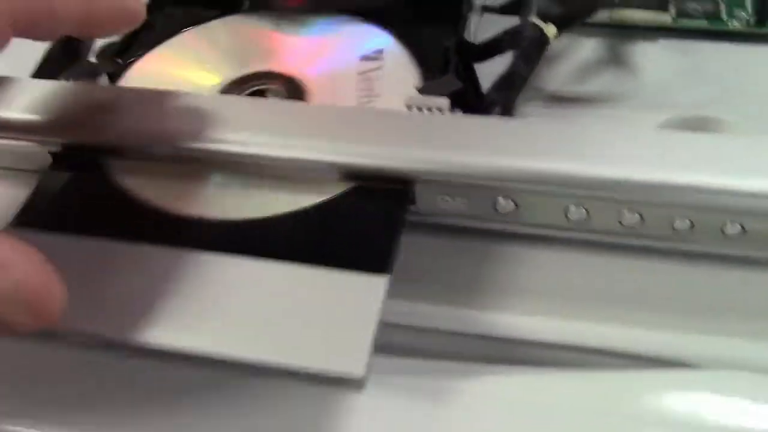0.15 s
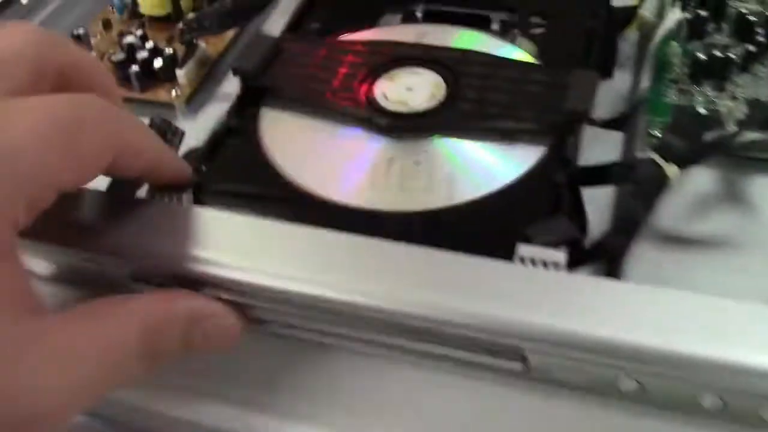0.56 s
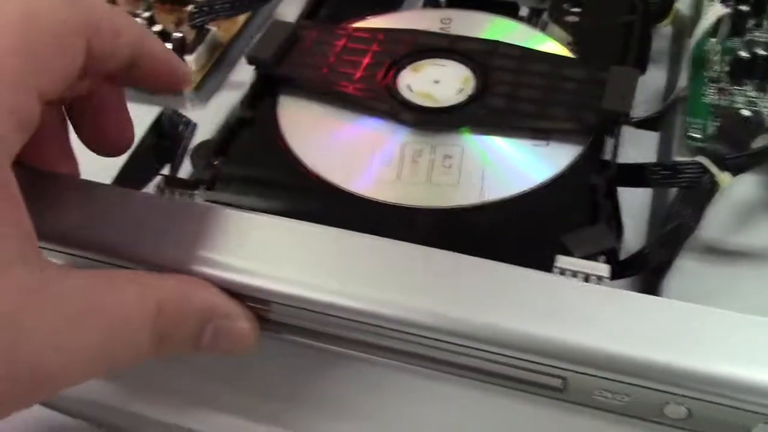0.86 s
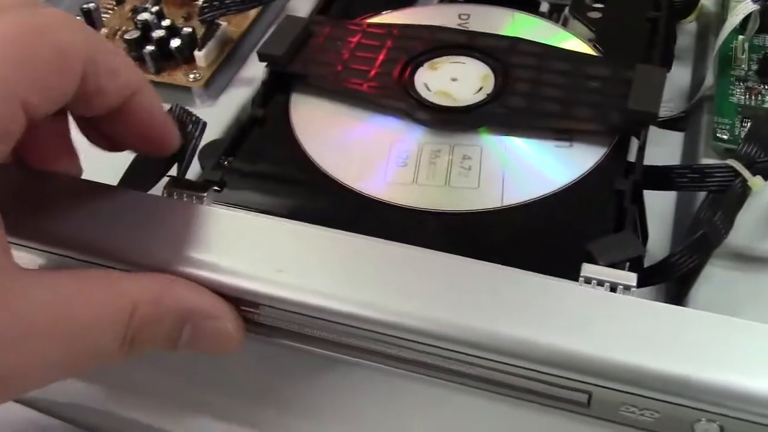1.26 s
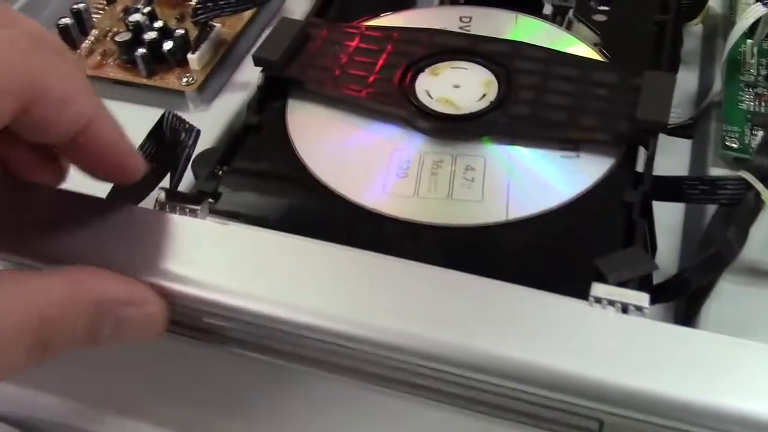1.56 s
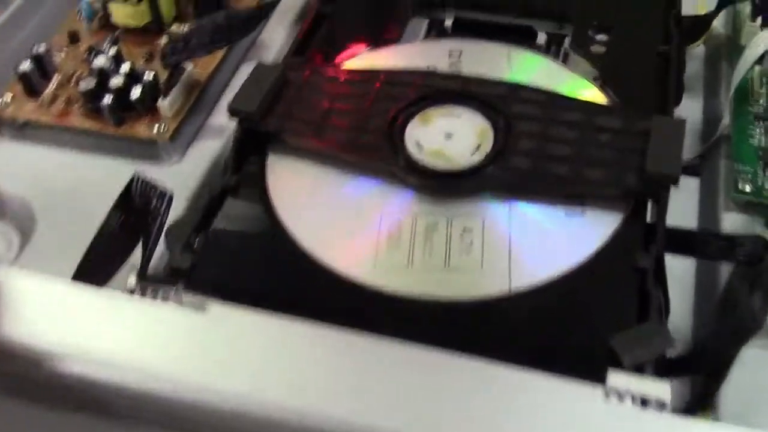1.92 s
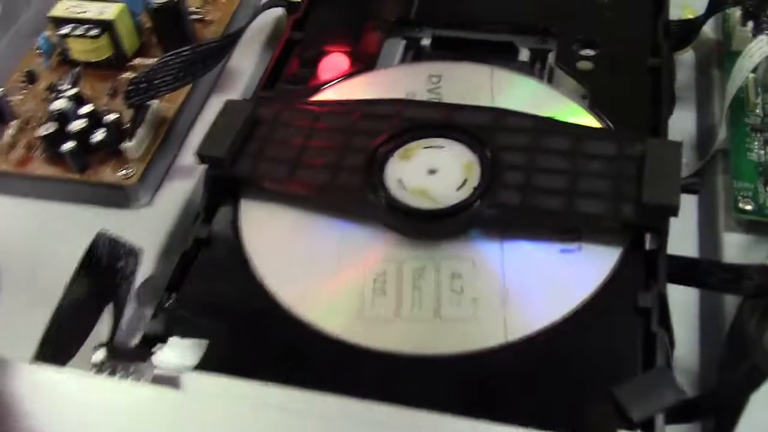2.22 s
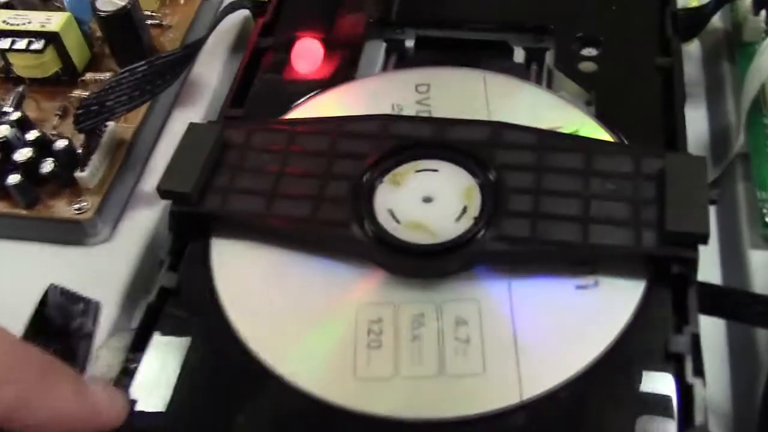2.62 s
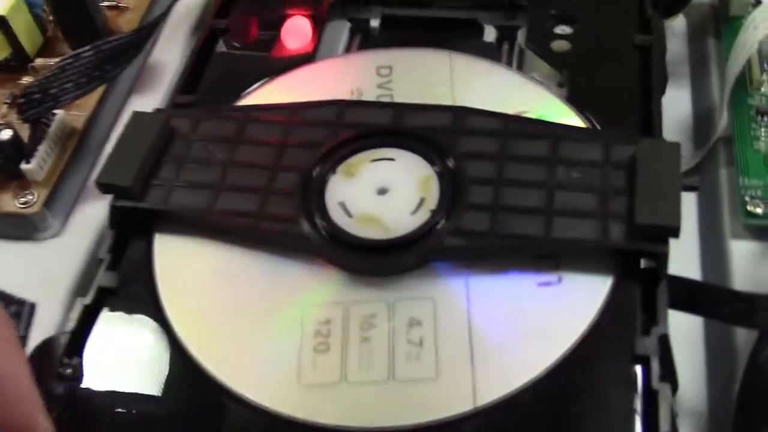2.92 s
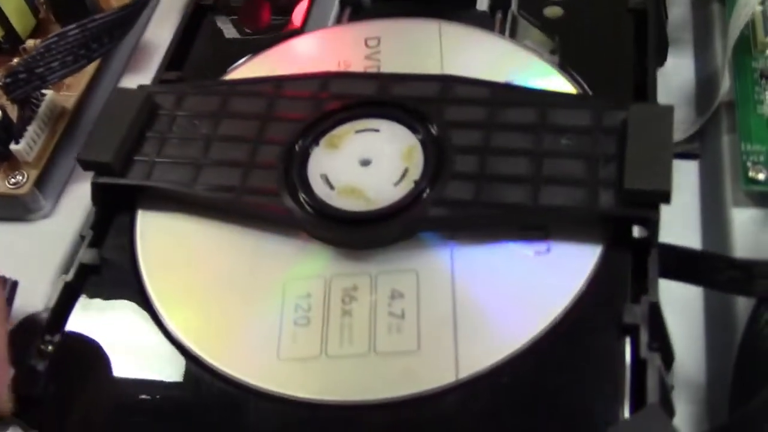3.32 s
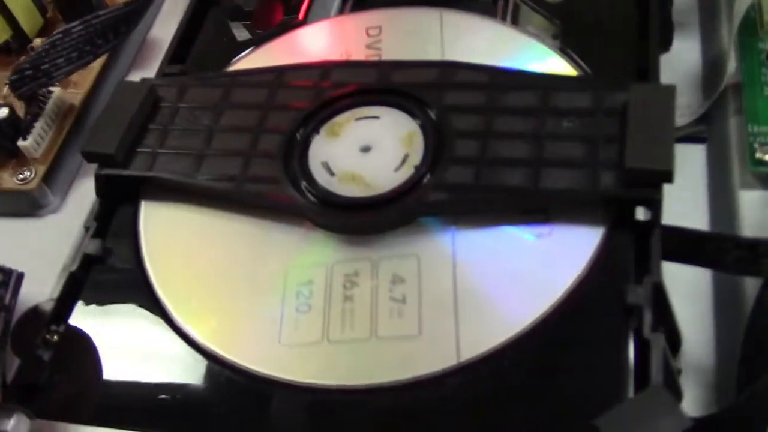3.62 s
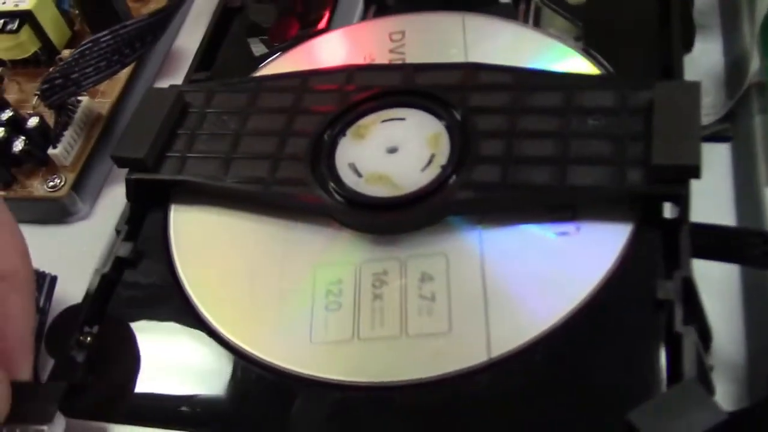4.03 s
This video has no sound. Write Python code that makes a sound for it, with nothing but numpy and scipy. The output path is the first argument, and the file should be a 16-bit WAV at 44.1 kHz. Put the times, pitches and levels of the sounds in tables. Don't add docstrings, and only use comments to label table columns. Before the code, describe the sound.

A plastic disc tray is pushed into an opened player on a workbench, rails scraping and a small gear whining for under half a second. Latch, clamp and end stop then clatter loudly in quick succession. Afterwards it is quiet: small regular lens buzzes, finger ticks, rubs and dull knocks over hiss and mains hum. Close stereo microphone, small room with a very short echo.

```python
import sys
import numpy as np
from scipy import signal
from scipy.fft import rfft, irfft
from scipy.io import wavfile
from scipy.ndimage import uniform_filter1d

SR = 44100
rng = np.random.default_rng(int(sys.argv[2]) if len(sys.argv) > 2 else 0)


def nominal_scale(level):
    x = np.asarray(level, float) / 20
    return 10 ** x


def master(y):
    cut = np.clip(np.atleast_2d(y).T, -1, 1)
    pcm = np.round(cut * 32767)
    wavfile.write(sys.argv[1], SR, pcm.astype(np.int16))


N = 184073

# frequency in Hz, likeness from 0 to 1.
NEAR_LIKENESS = [(60, 0.87), (180, 0.98), (550, 0.94), (1650, 0.94), (4970, 0.8), (15000, 0.56)]


def rms_one(x):
    return x / np.sqrt(np.mean(x ** 2) + 1e-20)


def in_time(rows):
    s, *columns = np.transpose(rows)
    return [np.interp(np.arange(N) / SR, s, c) for c in columns]


def at_hz(points, hz):
    point_hz, values = np.array(points).T
    return np.interp(np.log(hz), np.log(point_hz), values)


def resonance(x, hz, width_hz):
    r = np.exp(-np.pi * width_hz / SR)
    poles = [1, -2 * r * np.cos(2 * np.pi * hz / SR), r * r]
    return signal.lfilter([(1 - r * r) / 2, 0, (r * r - 1) / 2], poles, x + 1e-18)


def pair(alike, grain_db=0.):
    sizes = nominal_scale(grain_db * np.minimum(rng.exponential(1, N), 5))
    mid, side = rfft(rng.standard_normal((2, N)) * sizes)
    share = np.clip(at_hz(alike, np.arange(len(mid)) * SR / N + 1), 0, 1)
    left_right = np.sqrt(1 + share) * mid + np.sqrt(1 - share) * side * [[1], [-1]]
    return rms_one(irfft(left_right, N))


def coloured(spectrum):
    size = 8192
    hz = np.arange(size // 2 + 1) * SR / size + 1
    cepstrum = irfft(np.log(nominal_scale(at_hz(spectrum, hz))))
    cepstrum[1:size // 2] *= 2
    cepstrum[size // 2 + 1:] = 0
    return irfft(np.exp(rfft(cepstrum)))


def shaped(x, spectrum):
    hz = np.arange(N // 2 + 1) * SR / N + 1
    return rms_one(irfft(rfft(x) * nominal_scale(at_hz(spectrum, hz)), N))


def spells(rows, fade_s):
    out = np.zeros(N)
    for a, b, db in rows:
        t = np.arange(max(round(a * SR), 0), min(round(b * SR), N))
        out[t] += nominal_scale(db) * np.clip(np.minimum(t / SR - a, b - t / SR) / fade_s, 0, 1)
    return out


def room_hiss():
    # frequency in Hz, left-right likeness from 0 to 1.
    hiss_likeness = [(60, 1), (130, 0.17), (290, 0.12), (640, 0.0274), (1400, 0.02), (3100, 0.18),
                     (7000, 0.31), (15000, 0.089)]
    # frequency in Hz, level in dB per Hz.
    hiss_colour = [(15, -52), (25, -14), (45, -20.5), (70, -7), (190, -9.5), (307, -7), (587, -12.5),
                   (857, -17.5), (1360, -20.5), (1780, -18.5), (2590, -23), (4450, -25.5), (10300, -33.5),
                   (13500, -39), (15000, -43), (15800, -57.5)]
    return nominal_scale(-53.5) * shaped(pair(hiss_likeness), hiss_colour)


def supply_hum():
    # frequency in Hz, rms level in dB, width in Hz.
    hum_lines = [(120.4, -64.5, 4.2), (173.1, -63, 10.3), (357, -72.5, 6.1), (781, -73.5, 16),
                 (862, -72.5, 27), (1530, -73.5, 110), (4400, -76, 210), (10010, -76.5, 218),
                 (10800, -77.5, 900)]
    t, out = np.arange(N) / SR, np.zeros((2, N))
    noise = pair([(20, 0.411), (20000, 0.16)])
    for hz, db, width_hz in hum_lines:
        narrow = rms_one(resonance(resonance(noise, hz, width_hz), hz, width_hz))
        steady = np.clip(1.2 - width_hz / 8, 0, 1)
        tone = np.sqrt(2) * np.sin(2 * np.pi * hz * t)
        out = out + nominal_scale(db) * (steady * tone + np.sqrt(1 - steady ** 2) * narrow)
    waver = rms_one(resonance(rng.standard_normal(N), 4.7, 6.1))
    null_s, beat_s = 1.3, 1.52
    beat = np.sin(np.pi * (t - null_s) / beat_s)
    for hz, db, swell in [(59.8, -60, beat), (240.6, -58, 1)]:
        phase = 2 * np.pi * hz * t + 0.204 * waver + np.array([[0], [.5]])
        out = out + swell * np.sqrt(2) * nominal_scale(db + 1.8 * waver) * np.sin(phase)
    return out + supply_whistle(waver)


def supply_whistle(waver):
    start_s, period_s, count = .862, .147, 10
    on_s, level_db, whistle_hz = 0.0635, -75, 5570
    starts = start_s + period_s * np.arange(count)
    rows = [(s, s + on_s * rng.uniform(0.7, 1.7), level_db + rng.normal(0, 1.5)) for s in starts]
    tone = np.sin(2 * np.pi * whistle_hz * np.arange(N) / SR + 0.44 * waver)
    return spells(rows, fade_s=0.0052) * np.sqrt(2) * tone


def room_tone():
    return (room_hiss() + supply_hum()) * nominal_scale(np.array([[.35], [-.35]]))


def bench(x):
    t60_s, first_echo_s = 0.19, .004
    age = np.arange(SR // 2) / SR
    tail = rng.standard_normal((2, len(age))) * nominal_scale(-60 * age / t60_s) * (age > first_echo_s)
    tail = signal.lfilter([.4], [1, -.6], tail)
    return signal.fftconvolve(x, tail / np.sqrt(np.sum(tail[0] ** 2)), axes=1)[:, :N]


def rumble():
    # start in seconds, end in seconds, level in dB.
    hand_loads = [
        (0, .5, -64),
        (.45, .76, -36),
        (.6, .95, -53.5),
        (1.05, 2.2, -65.5),
        (2.5, 3.8, -60),
        (2.9, 3.17, -56),
        (3.2, 3.42, -62),
        (3.9, 4.17, -75),
    ]
    # frequency in Hz, level in dB per Hz.
    rumble_colour = [(50, -10.5), (90, -6.5), (180, -3.5), (320, 4.5), (500, 0), (800, -37.5)]
    return spells(hand_loads, fade_s=0.15) * shaped(pair(NEAR_LIKENESS), rumble_colour)


def ticks():
    # peak time in seconds, peak in dB, ring in Hz.
    rail_burrs = [(.062, -48.5, 1750), (.063, -38, 2640), (.1017, -47, 1900), (.112, -39, 2540),
                  (.154, -37, 3500), (.158, -38, 2150), (0.187, -40, 4130), (.2044, -38, 2470),
                  (.2044, -37, 3700), (.222, -38, 3370), (.2225, -42, 2600), (.232, -38, 2930),
                  (.24, -44, 3330), (.251, -36, 2390), (.252, -44, 3270), (.27, -45, 3250),
                  (.271, -39, 1893), (.335, -41, 3100), (.338, -42, 3700), (.366, -45, 3300),
                  (.396, -43, 3500), (0.223, -36, 1880), (.245, -36, 2900), (0.268, -43, 2730),
                  (0.285, -43, 1430), (.298, -35, 2340), (.312, -49, 4160), (.3346, -35, 2300),
                  (0.353, -32, 3880), (0.359, -38, 3080), (.365, -37, 1350), (.395, -43, 4320),
                  (.401, -33, 2320)]
    # peak time in seconds, peak in dB, ring in Hz.
    faint_ticks = [(1.475, -58, 3800), (1.54, -57, 3000), (1.54, -58, 4400), (1.587, -52, 6400),
                   (1.586, -57, 4170), (1.104, -51, 1880), (1.104, -46, 690), (2.195, -52, 1800),
                   (2.549, -48, 1985), (2.551, -49, 1270), (2.67, -55, 3210), (2.72, -56, 1450),
                   (2.92, -44.5, 3800), (2.92, -47, 3100), (3.13, -56, 1730), (3.31, -53, 850),
                   (3.312, -45, 3100), (3.818, -47, 3800), (3.858, -46, 3900), (1.14, -57, 4400),
                   (1.385, -59, 6100), (2.245, -52, 1780), (2.5, -55, 5470), (2.755, -49.5, 1530),
                   (3.0, -54, 3750), (3.27, -55, 1610), (3.595, -53, 2010), (3.6, -56, 1500),
                   (3.76, -60, 1480), (4.01, -53.5, 1480), (4.064, -48, 3560), (4.064, -53, 2810),
                   (4.064, -49, 4540)]
    step_start_s, step_period_s, step_db, step_hz = .795, .06663, -57, 1750
    steps = [(s, step_db, step_hz) for s in np.arange(step_start_s, N / SR, step_period_s)]
    rough = .7
    out, age = np.zeros((2, N + SR)), np.arange(SR // 12) / SR
    for rows, t60 in [(rail_burrs, .035), (faint_ticks, 0.06), (steps, 0.043)]:
        for s, db, hz in rows:
            bite = rms_one(uniform_filter1d(rng.standard_normal((2, len(age))), size=60))
            envelope = nominal_scale(db - 60 * age / t60) * (1 - np.exp(-age / 0.0003))
            ring = envelope * np.sin(2 * np.pi * hz * age + rough * bite[0])
            start = round(s * SR)
            out[:, start:start + len(age)] += ring * (1 + rough / 2 * bite)
    return out[:, :N]


def singing():
    # start and end in seconds, level in dB, pitch and width in Hz.
    sung = [(0, 0.07, -53.5, 790, 30), (0.0081, 0.099, -53, 870, 25), (.125, 0.24, -54, 950, 25),
            (0.14, 0.3, -51, 835, 12), (0.195, 0.24, -54, 525, 30), (.42, .5, -43, 372.5, 16),
            (.506, .54, -44, 9300, 1300), (.45, 0.473, -33.5, 4200, 840), (.485, .5, -42, 3200, 500),
            (.66, .70, -46, 2000, 160), (.7, .75, -56, 1980, 120), (.4, 0.47, -47, 890, 20),
            (.2, .39, -53, 1350, 30), (0, 0.201, -55.5, 190, 35), (.28, .41, -53.5, 700, 65)]
    # start and end in seconds, level in dB, pitch and width in Hz.
    whispers = [(1.225, 1.245, -62.5, 6300, 1800), (1.731, 1.754, -60, 6300, 2500),
                (1.975, 1.993, -64, 5770, 2000), (2.63, 2.665, -65, 3300, 360),
                (2.714, 2.735, -60.5, 9000, 2000), (3.248, 3.27, -61, 6300, 1200),
                (3.33, 3.38, -64, 3730, 500), (3.557, 3.578, -60, 3400, 600),
                (3.753, 3.775, -64, 6560, 900), (4.075, 4.09, -60, 8800, 1500),
                (1.466, 1.51, -65, 1546, 66), (0.796, 1.85, -70.5, 781, 7.5), (2.126, 2.2, -63, 4260, 500),
                (3.386, 3.42, -65, 3500, 900), (3.864, 3.884, -62, 2000, 700)]
    friction, out = pair(NEAR_LIKENESS), np.zeros((2, N))
    for a, b, db, hz, width in sung + whispers:
        around = slice(max(round(a * SR) - SR // 4, 0), round(b * SR))
        voice = rms_one(resonance(resonance(friction[:, around], hz, width), hz, width))
        out[:, around] += spells([(a, b, db)], fade_s=0.0079)[around] * voice
    return out


def scratches():
    # start in seconds, end in seconds, level in dB.
    nail_strokes = [
        (2.03, 2.055, -58),
        (2.716, 2.74, -56),
        (2.75, 3.42, -66),
        (2.915, 2.95, -58),
        (3.25, 3.272, -62),
        (3.283, 3.314, -50.5),
        (3.565, 3.605, -62),
        (3.8, 3.826, -59),
        (4.058, 4.102, -52.5),
    ]
    # frequency in Hz, level in dB per Hz.
    scratch_colour = [(500, -42), (2000, -4), (4000, -1), (8000, -7), (12000, -11), (15500, -21)]
    grit = shaped(pair(NEAR_LIKENESS, grain_db=4.0), scratch_colour)
    return spells(nail_strokes, fade_s=0.0059) * grit


def rubs():
    # start in seconds, end in seconds, level in dB.
    skin_drags = [
        (2.114, 2.345, -61.5),
        (2.651, 2.693, -54),
        (2.757, 2.854, -60.5),
        (3.037, 3.11, -58.5),
        (3.286, 3.39, -53),
        (3.798, 3.902, -62),
    ]
    rub_hz, width_hz = 3500, 750
    friction = pair(NEAR_LIKENESS, grain_db=4.5)
    narrow = resonance(friction, rub_hz, width_hz)
    return spells(skin_drags, fade_s=0.021) * rms_one(resonance(narrow, rub_hz, width_hz * 12.0))


def lens():
    stroke_levels = [-43.5, -55, -49, -57, -50.5, -64, -54, -59, -63, -58, -53, -66]
    # frequency in Hz, level in dB, decay time t60 in seconds.
    lens_modes = [(1529, -4, 0.08), (2010, -4.5, 0.072), (3800, -17, 0.02), (7050, -16, 0.032)]
    start_s, period_s = 1.230, .2525
    out, age = np.zeros(N + SR), np.arange(SR // 10) / SR
    for k, db in enumerate(stroke_levels):
        start = round((start_s + period_s * k) * SR)
        for hz, mode_db, t60 in lens_modes:
            buzz_db = 3.7 * rms_one(uniform_filter1d(rng.standard_normal(len(age)), size=70))
            ring_db = db + mode_db + rng.normal(0, 1.4) + buzz_db - 60 * age / t60
            ring = nominal_scale(ring_db) * (1 - np.exp(-age / 0.00091))
            out[start:start + len(age)] += ring * np.sin(2 * np.pi * hz * age + rng.uniform(0, 10.9))
    return out[:N]


def case(x, ring_db):
    # frequency in Hz, width in Hz, level in dB.
    case_modes = [(490, 2.8, -4.5), (850, 45, 3.5), (954, 43, 6), (1273, 15, 9), (1327, 14, 7.5),
                  (1450, 26, 6), (1750, 39.5, -5.5), (1950, 78, 1), (2170, 12, -34.5), (2363, 50.6, -1.5),
                  (2854, 59, 0), (3240, 149, -11.5), (3870, 100, -4.5), (4000, 47, 4.5), (6900, 2200, 2),
                  (9030, 820, -2), (11400, 2100, 0)]
    rings = sum(nominal_scale(db) * resonance(x, hz, width) for hz, width, db in case_modes)
    return x + nominal_scale(ring_db) * rings


def of_parts(parts):
    return [(*row, hz, length) for rows, hz, length in parts for row in rows]


def contacts(rows, gain_db, ring_db, grain_db, rise, own_db, crack_db):
    # frequency in Hz, level in dB per Hz.
    blow_colour = [(120, -37), (200, -24.5), (366, -11), (423, -19.5), (481, 1), (1060, -7), (1550, -0.5),
                   (3660, 2), (4730, -7.5), (9500, -12), (12500, -16.5), (15800, -24.5)]
    out, age = 0, np.arange(SR // 8) / SR
    noise = pair(NEAR_LIKENESS, grain_db)
    body = case(coloured(blow_colour), ring_db)

    def burst(length):
        return nominal_scale(-20 * age / length) * (1 - np.exp(-age / (rise * length)))

    # low and high Hz, column of its own level, stretch of the burst, level in dB
    bands = [(205, 1070, 2, 1.43, -7.5), (1040, 4100, None, 1.53, -8.0), (4955, 14300, 3, 1.06, -1.5)]
    for low, high, column, longer, band_db in bands:
        force, crack = np.zeros((2, N + len(age)))
        for row in rows:
            start = round(row[0] * SR)
            level_db = row[1] + (row[column] if column else 0) + band_db + gain_db
            force[start:start + len(age)] += nominal_scale(level_db) * burst(max(row[5], .002) * longer)
            crack[start + round(rise * row[5] * SR)] = nominal_scale(level_db + crack_db)
        band = signal.butter(2, [low, high], "band", fs=SR, output="sos")
        hits = signal.sosfilt(band, noise * force[:N] + crack[:N] + 1e-18)
        sign = 1 if column else -1
        out = out + hits * sign / np.linalg.norm(signal.sosfilt(band, body))
    out = signal.fftconvolve(out, body[None], axes=1)[:, :N]
    for s, db, _, _, hz, length in rows:
        start = round(s * SR)
        kick = noise[:, start:start + len(age)]
        own = resonance(kick * burst(max(length, .002))[:kick.shape[1]], hz, hz / 8)
        out[:, start:start + len(age)] += nominal_scale(db + own_db) * own / np.abs(own).max()
    return out


def finger_contacts():
    # time in seconds, peak in dB, body in dB re peak, edge in dB re peak.
    taps = [(1.103, -38.5, -14, -39), (1.5375, -40.5, -1, -14), (2.113, -50, 10.5, -6),
            (2.4643, -48, -14, -15), (2.789, -50.5, 11.5, -6), (3.754, -50.5, -17, -7),
            (3.8155, -57, -17, 5)]
    clicks = [
        (1.585, -35.5, -12, -21),
        (2.549, -34, -19, -20),
        (3.5915, -41.5, -20, -16),
    ]
    nails = [(2.6665, -48.5, 1, -1.5), (2.918, -37, -7, -20), (2.926, -44, -11, -17.5),
             (3.284, -41, -11, -20), (3.8597, -45, -24, -32), (3.8185, -62, -20, -12),
             (3.87, -45, -20, -22)]
    drags = [
        (2.9343, -46.5, -12, -3.5),
        (3.036, -46, -1, -6),
        (3.2953, -47.5, 0, -2),
        (3.5668, -51, -19, -3),
    ]
    flicks = [
        (3.581, -37.5, -17, -15),
        (3.952, -55.5, -18.5, 7),
        (4.0638, -39, -13, -8),
        (4.077, -46, -20, 3),
        (4.092, -46, -17, 5),
    ]
    # contacts, own ring in Hz, burst length in seconds
    parts = [(taps, 533, 0.0194), (clicks, 1660, .014), (nails, 4150, 0.0176),
             (drags, 860, 0.06), (flicks, 2930, 0.0056)]
    return contacts(of_parts(parts), gain_db=-5.5, ring_db=4.0, grain_db=2.0, rise=0.0494,
                    own_db=-10.0, crack_db=15.5)


def thumps():
    # blow in seconds, then modes of ring in Hz, peak in dB, t60 in seconds.
    struck_modes = [(0.376, [(923, -44, 0.39)]), (.417, [(815, -28, 0.082), (1340, -15, 0.015),
                    (2380, -17.5, 0.036)]), (0.449, [(180, -37.5, 0.13), (3570, -9, 0.022),
                    (3380, -13.5, 0.022)]), (0.5, [(82.3, -31, 0.17)]), (0.574, [(64.3, -38, 0.53),
                    (141, -23.5, 0.086)]), (.563, [(490, -31, 0.13), (862, -28.5, 0.084),
                    (3300, -10, 0.028), (1612, -19, 0.089), (1217, -26.5, 0.13), (1704, -27, 0.12),
                    (2363, -17, 0.094)]), (.597, [(366, -22, 0.11)]), (.63, [(1350, -15, .04),
                    (1909, -14.5, 0.076), (3666, -12.5, 0.041)]), (0.644, [(230, -29, 0.054),
                    (1450, -18, 0.024), (1850, -14, 0.025)]), (.688, [(181, -52, 0.98), (394.4, -39, 0.48),
                    (1068, -44.5, 0.25), (1420, -54, 0.33), (695, -36.5, 0.107), (2010, -41, 0.069)]),
                    (0.703, [(2830, -46.5, 0.18)]), (3.036, [(114.3, -43, 0.13)]),
                    (2.118, [(4400, -56.5, 0.13)]), (2.13, [(8400, -55, 0.05)])]
    # time in seconds, peak in dB.
    presses = [(1.098, -52), (2.553, -46), (2.575, -49), (2.932, -41), (2.972, -43), (3.044, -34.5),
               (3.292, -47)]
    # time in seconds, peak in dB.
    nudges = [
        (2.845, -50.5),
        (2.92, -49),
        (3.596, -50.5),
        (4.08, -52.5),
    ]
    # time in seconds, peak in dB.
    knocks = [
        (1.9709, -40),
        (2.1132, -37.5),
        (2.138, -43.5),
        (2.162, -45),
        (2.215, -44.5),
        (2.79, -46),
    ]
    # time in seconds, peak in dB, ring in Hz.
    cracks = [(0.4318, -30, 10000), (.4467, -29, 9000), (0.447, -28.5, 6500), (0.5351, -19, 6300),
              (.5352, -31, 10500), (.5532, -23, 8700), (0.5644, -16, 8200), (0.5653, -14, 10400),
              (.5655, -25, 14800), (0.5672, -8, 1900), (0.569, -20.5, 6500), (0.574, -18, 3600),
              (.5771, -25, 7500), (0.6311, -22, 9000), (0.6325, -14, 7000), (.6311, -27, 12000),
              (.5655, -20, 11800), (.5597, -14, 4600), (.548, -24, 8500), (.4965, -32, 2000),
              (.5588, -14, 3000), (0.6312, -21, 1500), (.6434, -13, 1700), (0.6434, -23, 7500),
              (.441, -20, 1600), (.4466, -31, 14500), (.4472, -20, 4400)]
    struck = [(s, db, hz, t60) for s, modes in struck_modes for hz, db, t60 in modes]
    struck += [(s, db, 278.5, 0.098) for s, db in presses]
    struck += [(s, db, 849, 0.11) for s, db in nudges]
    struck += [(s, db, 500, 0.028) for s, db in knocks]
    struck += [(s, db - 7, 1093, 0.028) for s, db in knocks]
    struck += [(s, db, hz, 0.0128) for s, db, hz in cracks]
    out, age = np.zeros(N + SR), np.arange(SR // 3) / SR
    for s, db, hz, t60 in struck:
        swell = 1 - np.exp(-age * hz / 0.53)
        start = round(s * SR)
        out[start:start + len(age)] += nominal_scale(db - 60 * age / t60) * swell * np.sin(2 * np.pi * hz * age)
    return out[:N]


def coast():
    # time in seconds, tooth rate in Hz, tone in dB.
    slowing = [
        (.485, 620, -56),
        (.505, 579.4, -41.5),
        (.53, 505, -42),
        (.56, 479, -37),
        (.585, 477, -37.5),
        (.6, 467, -51),
    ]
    hz, tone_db = in_time(slowing)
    t = np.arange(N) / SR
    turning = (t > slowing[0][0]) & (t < slowing[-1][0])
    return np.sqrt(2) * nominal_scale(tone_db) * turning * np.sin(2 * np.pi * np.cumsum(hz) / SR)


def gear():
    # time in seconds, tooth rate in Hz, tone in dB.
    tooth_rate = [
        (0, 429, -48),
        (.06, 390.3, -42.5),
        (.098, 429.7, -44),
        (.17, 389, -40),
        (.238, 397.2, -46.5),
        (.275, 427.7, -49.5),
        (.335, 550, -51),
        (.42, 540, -48),
    ]
    hz, tone_db = in_time(tooth_rate)
    turning = np.clip((tooth_rate[-1][0] - np.arange(N) / SR) / 0.0057, 0, 1)
    waver = rms_one(resonance(rng.standard_normal(N), 30.3, 60))
    phase = 2 * np.pi * np.cumsum(hz * (1 + .006 * waver)) / SR
    teeth = np.sin(phase) + nominal_scale(-18.5) * np.sin(2 * phase)
    tone = np.sqrt(2) * nominal_scale(tone_db) * teeth * nominal_scale(1.4 * waver)
    low_pass = signal.butter(2, 350, fs=SR, output="sos")
    brushes = rms_one(signal.sosfilt(low_pass, pair(NEAR_LIKENESS)))
    motor_hz = 12800 + 3.5 * (hz - 400)
    motor = nominal_scale(-63) * brushes * np.sin(2 * np.pi * np.cumsum(motor_hz) / SR)
    motor_end_s = .58
    return turning * tone + spells([(-.1, motor_end_s, 0)], fade_s=0.043) * motor


def catches(per_s, cycles, spread_db):
    sizes = nominal_scale(spread_db * np.minimum(rng.exponential(1, SR), 4)) * (rng.random(SR) < per_s / SR)
    dealt = rng.integers(0, 20, SR)
    pitches = np.geomspace(750, 4300, 20)
    rings = sum(resonance(sizes * (dealt == k), hz, hz / cycles) for k, hz in enumerate(pitches))
    return np.pad(rms_one(rings), (0, N - SR))


def scrape_levels():
    # peak time in seconds, level in dB, extra edge in dB.
    shakes = [
        (.47, -35, -36.5),
        (0.563, -26.5, 14),
        (0.65, -26, 2.5),
    ]
    rail_db, rail_gain_db_per_s, rail_end_s, rail_edge_db = -47.5, 13, 0.456, 4
    rise_db_per_s, fall_db_per_s = 240.5, 477
    t = np.arange(N) / SR
    past_end_s = np.maximum(t - rail_end_s, 0)
    rails = rail_db + rail_gain_db_per_s * t - (fall_db_per_s + rail_gain_db_per_s) * past_end_s
    layers = [(rails, rail_edge_db)]
    for s, db, edge_db in shakes:
        drop_db = np.maximum(rise_db_per_s * (s - t), fall_db_per_s * (t - s))
        layers.append((db - drop_db, edge_db))
    level = sum(nominal_scale(db) for db, _ in layers)
    return level, sum(nominal_scale(db + edge_db) for db, edge_db in layers)


def slide():
    # frequency in Hz, level in dB per Hz.
    slide_colour = [(59, -42), (100, -9), (340, -14.5), (394, -5), (477, -49), (530, -11), (861, -10.5),
                    (1160, -13.5), (1370, -13), (3300, -11.5), (5000, -29), (13100, -43.5), (14500, -46.5),
                    (15500, -62.5)]
    level, edge_level = scrape_levels()
    clumps = rms_one(resonance(rng.standard_normal(N), 27.6, 127))
    friction = shaped(pair(NEAR_LIKENESS, grain_db=4.5), slide_colour)[:, :SR]
    scrape = np.pad(rms_one(case(friction, ring_db=-14.0)), ((0, 0), (0, N - SR)))
    high_pass = signal.butter(2, 4600, "high", fs=SR, output="sos")
    edge = signal.sosfilt(high_pass, scrape + 1e-18)
    snagging = nominal_scale(-10.5) * catches(per_s=550.0, cycles=75.0, spread_db=3.5)
    return nominal_scale(2.0 * clumps) * (level * (scrape + snagging) + edge_level * edge)


def tray_contacts():
    # time in seconds, peak in dB, body in dB re peak, edge in dB re peak.
    snags = [(0.061, -28.5, -7, -21), (0.152, -24.5, -9, -13.5), (0.203, -30.5, 6.5, 2.5),
             (0.224, -22.5, -17, -19), (0.265, -46, -20, 13.5), (0.2816, -34.5, 8, 4),
             (0.362, -42, -7, -24)]
    latch = [
        (0.416, -8.5, -9, -11),
        (0.4295, -13.5, -1.5, -2),
        (0.442, -22.5, 8, -1.5),
        (0.4463, -15.5, -37, -0.5),
    ]
    cam = [
        (0.493, -22.5, -3, -24),
        (0.512, -14, -20, -15),
        (0.523, -18, -21, -11),
        (0.5345, -5.5, -31, -12),
        (0.5492, -6.5, -16, -3),
    ]
    clamp = [
        (0.5577, -4, -2, -25.5),
        (0.5625, -10.5, -13, -6),
        (0.568, -4.5, -4, -3),
        (0.5834, -16.5, 10, -0.5),
        (0.5915, -23, 8.5, -8),
    ]
    end_stop = [
        (0.6252, -8.5, 2, -9),
        (0.6291, -7, -8, -3),
        (0.643, -35, -44, -4),
    ]
    settling = [
        (0.6668, -15.5, -3, -15),
        (0.673, -26, -21, -18),
        (0.706, -36, 4, -17),
        (0.725, -35, -2, -27),
        (0.776, -47, 8, -34),
    ]
    snaps = [(0.446, -26, -22.5, 3.5), (0.5078, -25, -23.5, 1.5), (0.535, -17, -21.5, -8),
             (0.5595, -11, -12.5, -14.5), (0.5652, -6.5, -20, 2.5), (0.575, -4.5, -6, -13),
             (0.630, -19, -8, -1), (0.4313, -31, -21, -1), (0.552, -23, -20.5, -8), (0.643, -18, -20, -10),
             (0.6535, -31, -20, 1), (0.6662, -28, -23, 1), (0.6745, -27.5, -20, 4), (0.703, -40, -17, 5)]
    # contacts, own ring in Hz, burst length in seconds
    parts = [(snags, 2400, 0.012), (latch, 1455, 0.013), (cam, 5950, 0.016), (clamp, 1300, 0.012),
             (end_stop, 1200, 0.0099), (settling, 2440, 0.015), (snaps, 3000, 0.0033)]
    return contacts(of_parts(parts), gain_db=-4.0, ring_db=-5.0, grain_db=2.0, rise=0.17,
                    own_db=-22.0, crack_db=3.0)


def scene():
    shut = tray_contacts() + slide() + gear() + coast() + thumps()
    fingers = finger_contacts() + rubs() + lens() + rumble() + scratches()
    near = shut * nominal_scale(np.array([[.6], [-.6]])) + fingers * nominal_scale(np.array([[.3], [-.3]]))
    return near + nominal_scale(-26.5) * bench(near) + room_tone() + singing() + ticks()


def band_limit(x):
    return signal.sosfilt(signal.butter(12, 16250, fs=SR, output="sos"), x)


def record(dry):
    rounded = 0.91 * np.tanh(dry / 0.98)
    top_cut = signal.cheby2(16, 70, 16200, fs=SR, output="sos")
    return band_limit(signal.sosfilt(top_cut, rounded))


dry = scene()
out = record(dry)
master(out)
```